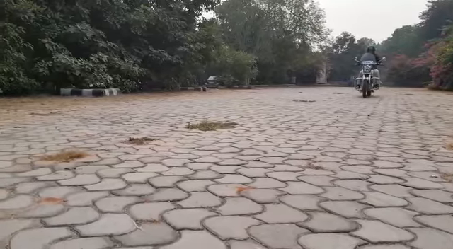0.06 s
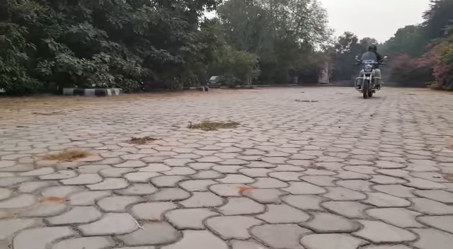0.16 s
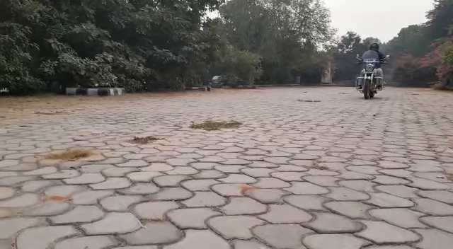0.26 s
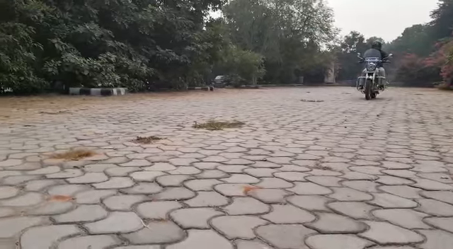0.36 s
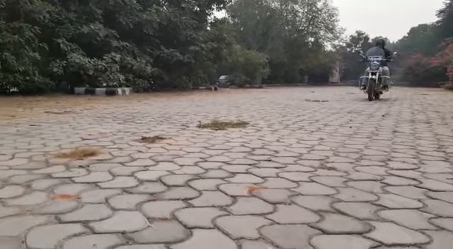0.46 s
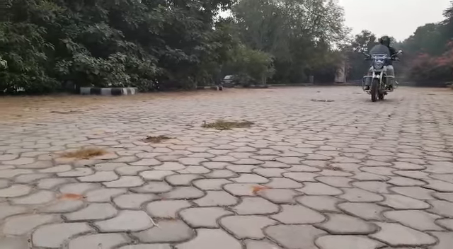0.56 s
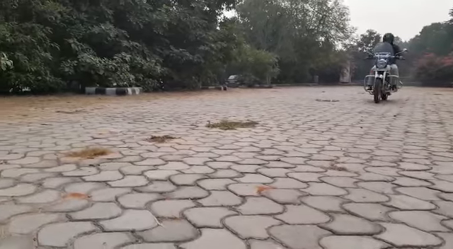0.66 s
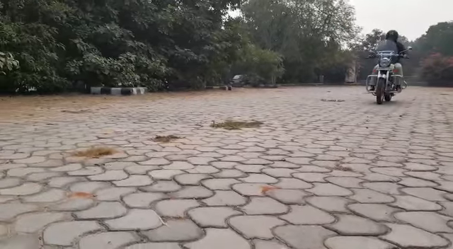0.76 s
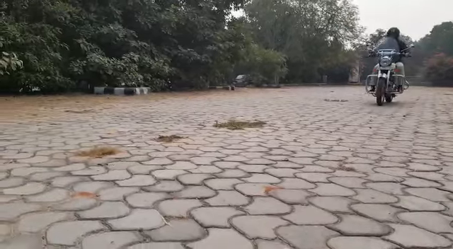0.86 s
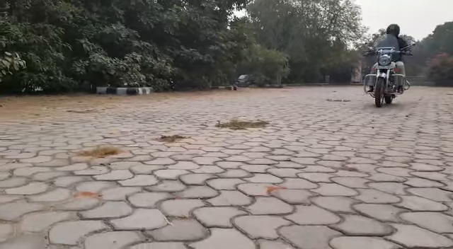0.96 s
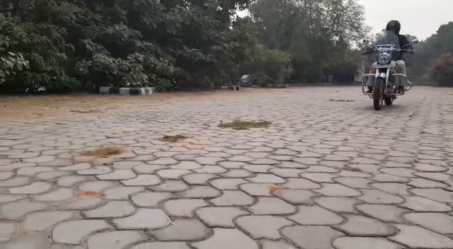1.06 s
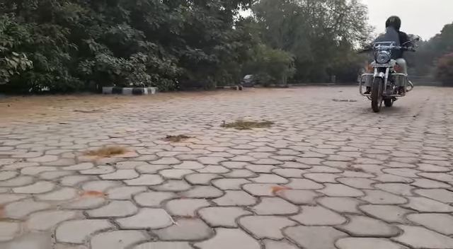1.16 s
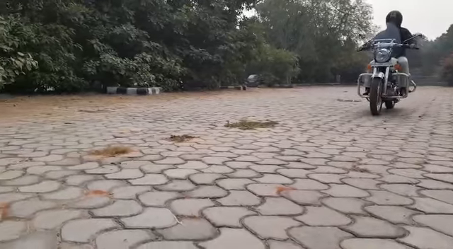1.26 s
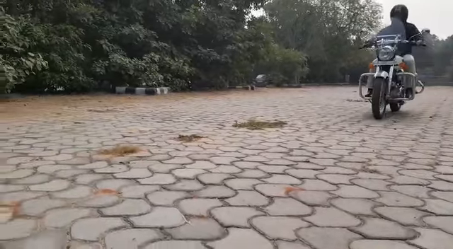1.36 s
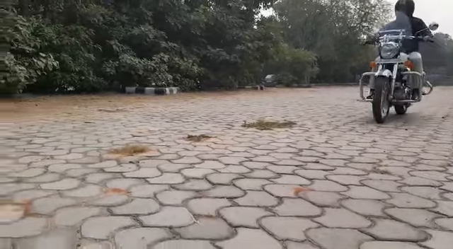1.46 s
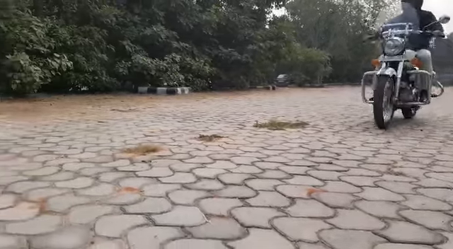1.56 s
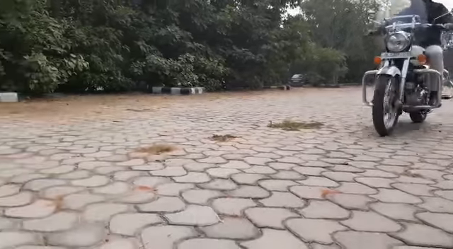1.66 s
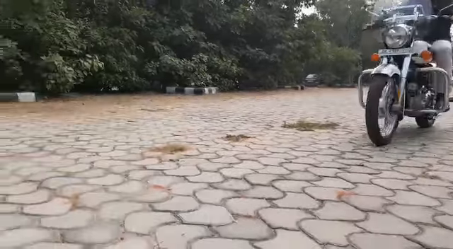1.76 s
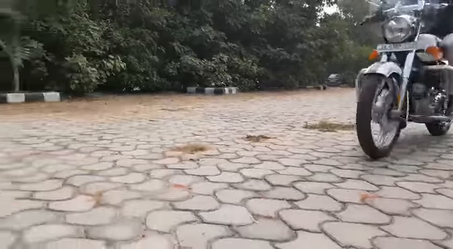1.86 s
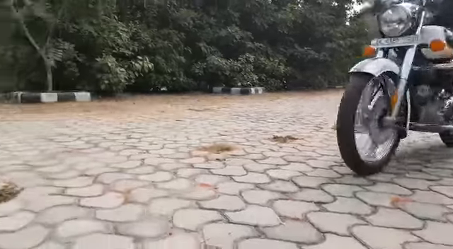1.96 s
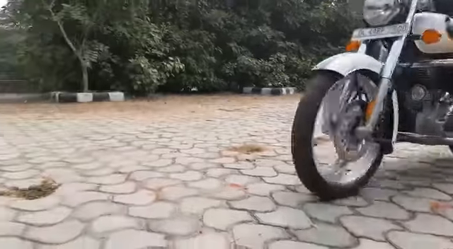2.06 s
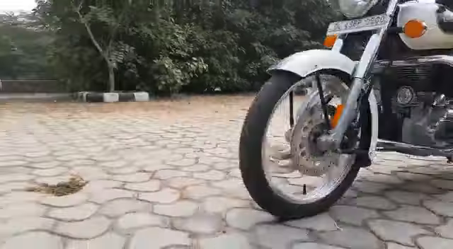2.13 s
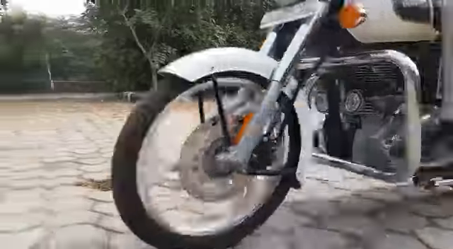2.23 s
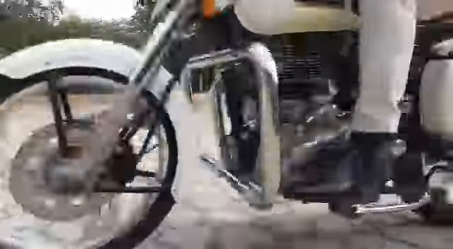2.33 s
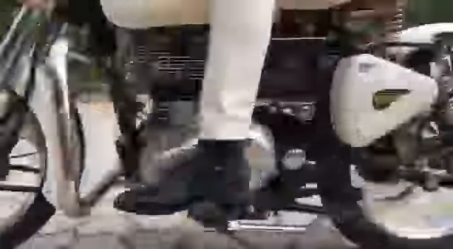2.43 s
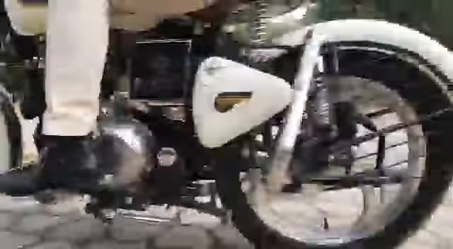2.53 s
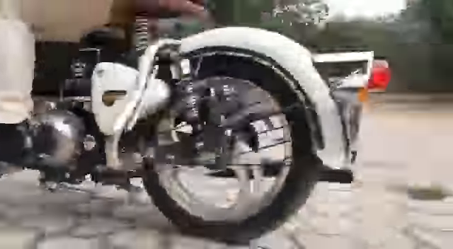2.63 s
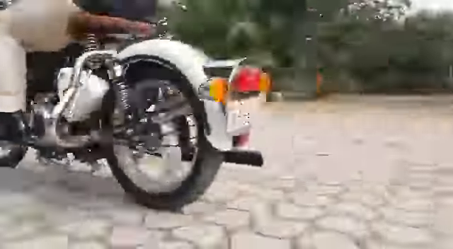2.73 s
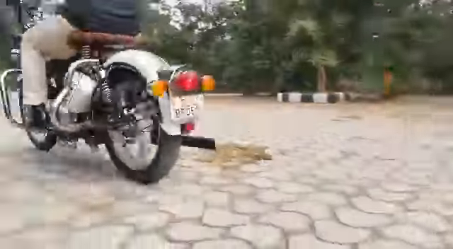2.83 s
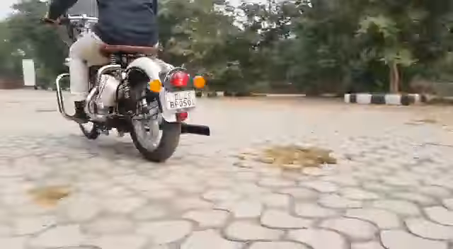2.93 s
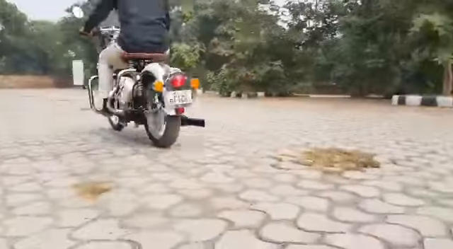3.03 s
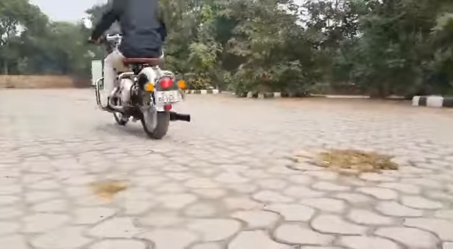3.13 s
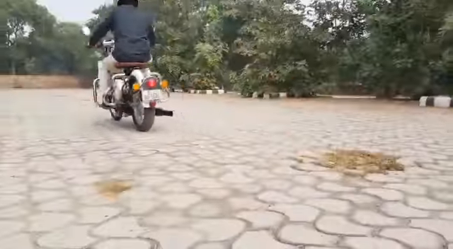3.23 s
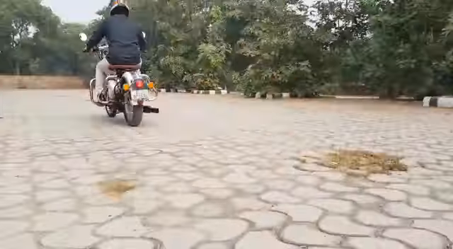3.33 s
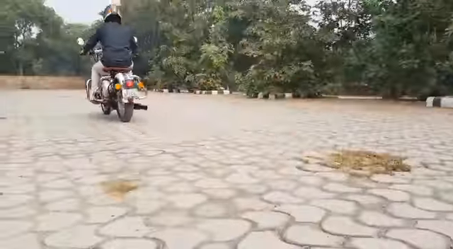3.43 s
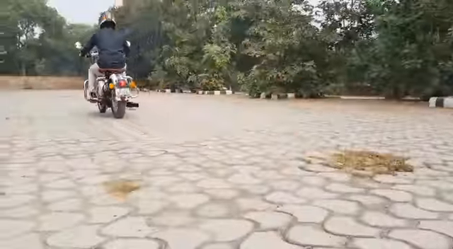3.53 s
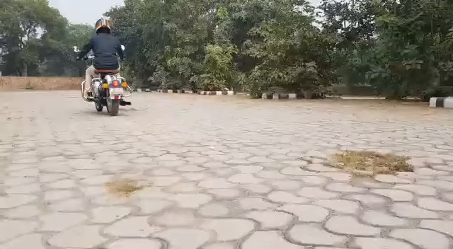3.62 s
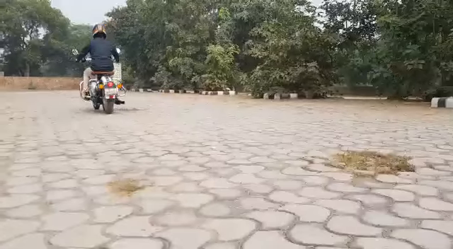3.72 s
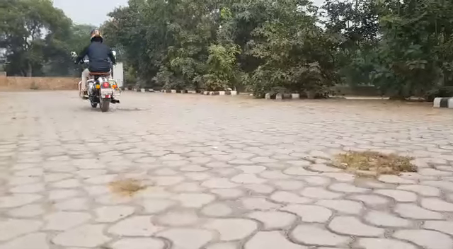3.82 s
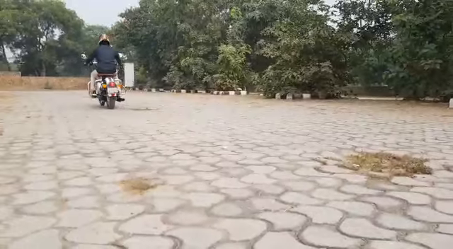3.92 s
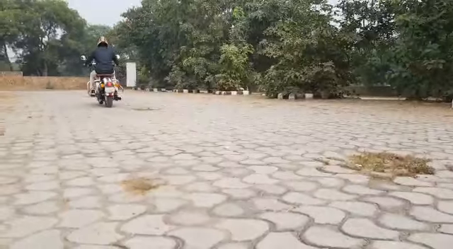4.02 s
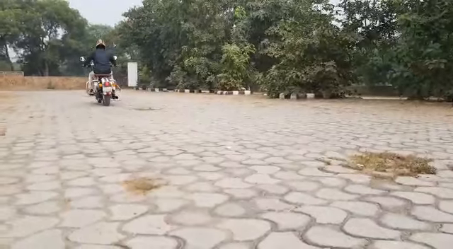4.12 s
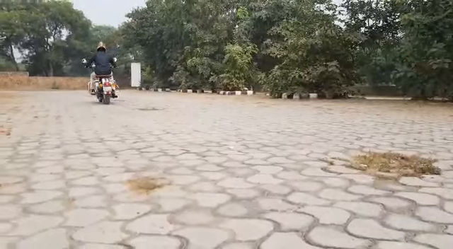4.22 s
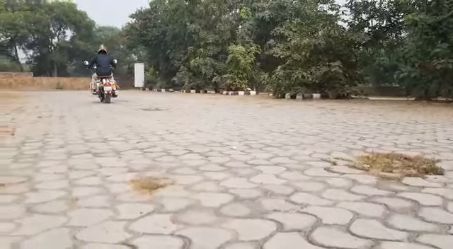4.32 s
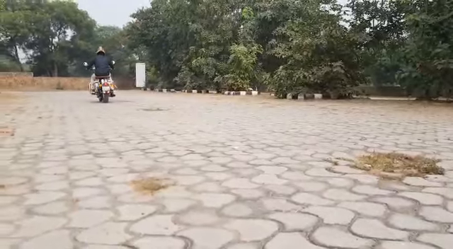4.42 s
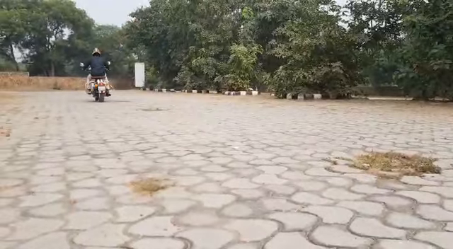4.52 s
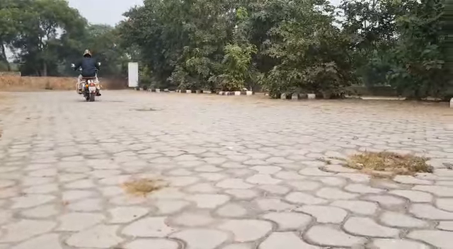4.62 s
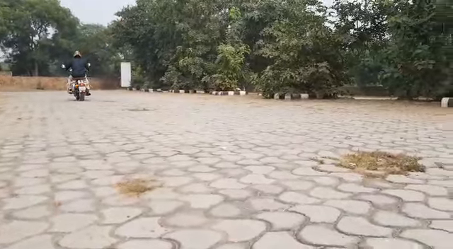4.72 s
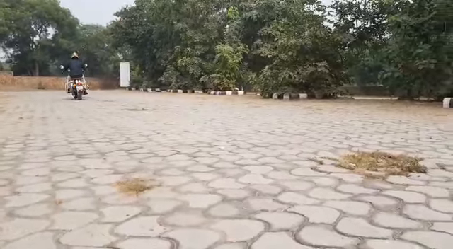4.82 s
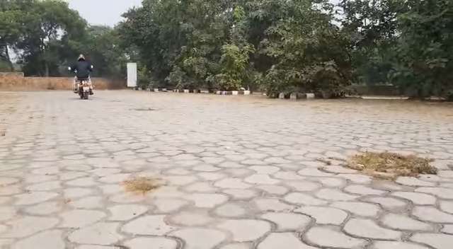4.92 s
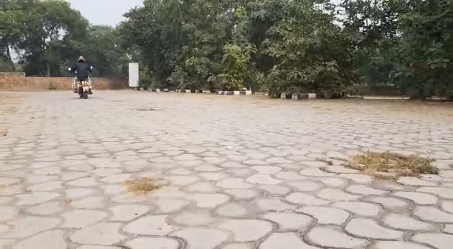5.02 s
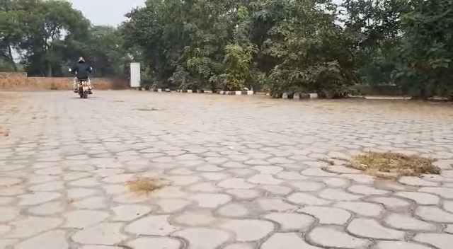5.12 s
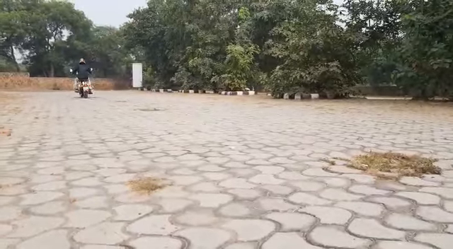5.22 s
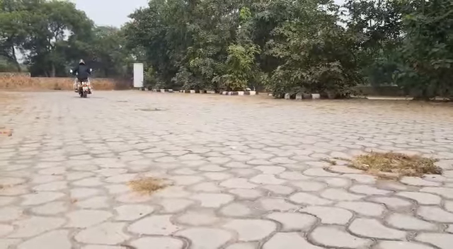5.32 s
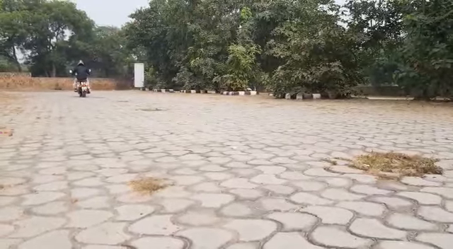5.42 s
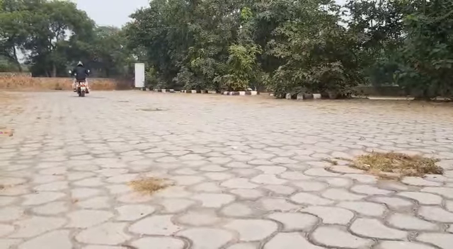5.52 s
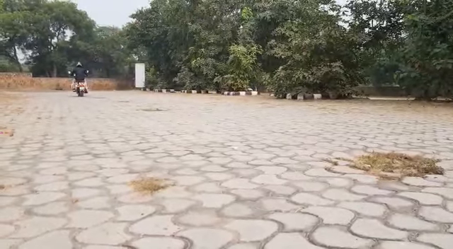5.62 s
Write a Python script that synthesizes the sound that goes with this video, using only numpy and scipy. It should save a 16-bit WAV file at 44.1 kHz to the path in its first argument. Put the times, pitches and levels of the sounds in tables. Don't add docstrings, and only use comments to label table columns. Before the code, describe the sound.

A single-cylinder motorcycle thumps towards a low microphone, passes very close with rattling chain and metal, then rides off with a barking exhaust.

```python
import sys
import numpy as np
from scipy import signal
from scipy.fft import rfft, irfft, next_fast_len
from scipy.io import wavfile
from scipy.ndimage import uniform_filter1d, map_coordinates

SR = 44100
rng = np.random.default_rng(int(sys.argv[2]) if len(sys.argv) > 2 else 0)


def boost_factor(decibels):
    exponent = np.asarray(decibels, float) / 20
    return 10 ** exponent


def store_pcm(level_fs):
    pcm = np.round(np.clip(level_fs, -1, 1) * 32767).astype(np.int16)
    wavfile.write(sys.argv[1], SR, np.atleast_2d(pcm).T)


N = 250488

# time_s, firing_rate_hz, trough_peak_db
ENGINE_CURVE = [(0.0, 12.294, -12.0), (0.24, 13.187, -9.4), (0.62, 13.338, -9.1), (1.78, 14.487, -2.6),
                (1.9, 14.387, -2.3), (2.1, 14.808, -0.9), (2.59, 15.009, -1.3), (2.83, 14.812, -0.7),
                (3.58, 15.169, -10.6), (4.17, 15.449, -12.0), (4.34, 15.353, -11.3), (4.97, 15.763, -10.2),
                (5.36, 15.808, -11.4), (5.68, 15.893, -13.3)]
# time_s, level_db (over its far level)
NEARNESS = [(0, 2.5), (.75, 5.5), (1.4, 9), (1.88, 16), (2.06, 18.5), (2.23, 22), (2.4, 25), (2.66, 19),
            (2.8, 14.5), (3.01, 9), (3.3, 5.5), (3.75, 1.5), (4.1, 0.5), (5.68, 0)]


def rms_one(x):
    return x / np.sqrt(np.mean(x ** 2) + 1e-20)


def in_time(rows):
    time_s, *columns = np.transpose(rows)
    return [np.interp(np.arange(N) / SR, time_s, column) for column in columns]


def at_hz(points, hz):
    return np.interp(np.log(hz), np.log(np.array(points)[:, 0]), np.array(points)[:, 1])


def drift(rate):
    r = np.exp(-80 * np.pi * rate / SR)
    slow = signal.lfilter([1], [1, -2 * r, r * r], rng.standard_normal(N // 40 + 2002))[2000:]
    return np.interp(np.arange(N) / 40, np.arange(len(slow)), rms_one(slow))


def ring(clicks, hz, t60):
    r = boost_factor(-60 / (t60 * SR))
    w = 2 * np.pi * hz / SR
    return signal.lfilter([0, np.sin(w)], [1, -2 * r * np.cos(w), r * r], clicks + 1e-18)


def band(x, low_hz, high_hz, order=2):
    sos = signal.butter(order, [low_hz, min(high_hz, .45 * SR)], "band", fs=SR, output="sos")
    return signal.sosfilt(sos, x)


def train(beats, after_s, sizes):
    at = ((beats[:, 0] + after_s) * SR).astype(int)
    out = np.zeros(N)
    out[at[at < N]] = sizes[at < N]
    return out


def facing_shares(alongside, tail_on):
    return np.array([(1 - alongside) * (1 - tail_on), alongside, (1 - alongside) * tail_on])


def firings():
    rate, level_db = in_time(ENGINE_CURVE)
    t = np.arange(N) / SR
    first_s, jitter_s, jitter_db = .0517, .0003, .4
    cycles = np.cumsum(rate) / SR
    cycles -= np.interp(first_s, t, cycles)
    s = np.interp(np.arange(int(cycles[-1]) + 1), cycles, t)
    uneven = rng.standard_normal((len(s), 2)) * [jitter_s, jitter_db]
    return np.c_[s, np.interp(s, t, level_db)] + uneven


def exhaust(beats, alongside, tail_on):
    # pitch_hz, t60_s, head_on_height, alongside_height, tail_on_height (signed)
    pipe_modes = [(57.6, 0.138, 0.26, 0.45, 0.31), (77.2, 0.058, -0.75, -0.95, -0.75),
                  (139.2, 0.036, -1.27, -2.0, -0.95), (136.1, 0.089, 1.2, 1.72, 0.98),
                  (185.5, 0.041, 0.88, 1.11, 0.52), (210.5, 0.054, 0.19, 0.09, 0.56),
                  (251.2, 0.051, -0.29, -0.32, -0.51), (317.3, 0.049, -0.38, -0.35, -0.42),
                  (392.6, 0.038, 0.24, 0.18, 0.27), (518.5, 0.065, -0.05, -0.03, -0.05),
                  (642.9, 0.131, 0.01, 0.02, 0.03)]
    lead_s = .0044
    s, level_db = beats.T
    facing = facing_shares(alongside, tail_on)[:, (s * SR).astype(int)]
    out = np.zeros(N)
    for hz, t60, *heights in pipe_modes:
        uneven_db = .25 * rng.standard_normal(len(s))
        sizes = boost_factor(level_db - 0.14 + uneven_db) * (heights @ facing)
        out += ring(train(beats, -lead_s, sizes), hz, t60)
    soft_edge = signal.butter(2, 700, fs=SR, output="sos")
    return signal.sosfilt(soft_edge, out)


def bark(beats, tail_on):
    echo_s, echo_db = .0175, 0.5
    sizes = boost_factor(beats[:, 1:] + 2 * rng.standard_normal((len(beats), 2))).T
    first = train(beats, -0.00303, sizes[0])
    second = train(beats, echo_s, sizes[1] * boost_factor(echo_db))
    edge = boost_factor(-31) * ring(first, 674, 0.023)
    edge += boost_factor(-29) * ring(first + second, 745, .022)
    edge += boost_factor(-38.5) * ring(first, 920, 0.011)
    back = boost_factor(-31.5) * ring(second, 866, 0.052) + boost_factor(-30) * ring(second, 1023, 0.021)
    return tail_on * (edge + back)


def fins(beats, alongside, tail_on):
    ring_hz, wander_hz = 985, 7
    swell_after_s, swell_s, steady = .027, .009, .45
    hidden_at = .3
    level = boost_factor(-32.5 + 1.35 * in_time(ENGINE_CURVE)[1])
    level = level * np.clip(1 - (alongside / hidden_at) ** 2 - 5 * tail_on, 0, 1)
    bump = np.exp(-.5 * (np.arange(-1500, 1501) / SR / swell_s) ** 2)
    hits = train(beats, swell_after_s, rng.gamma(5, .2, len(beats)))
    swell = signal.fftconvolve(hits, bump, "same")
    tone = np.sin(2 * np.pi * np.cumsum(ring_hz + wander_hz * drift(12)) / SR)
    tone *= boost_factor(1.2 * drift(3))
    return level * rms_one((steady + swell) * tone)


def contact_gate(beats, tail_on):
    # after_trough_ms, width_ms, head_on_power, tail_on_power (over the steady part)
    contacts = [
        (0.1, 1.2, 0.36, 0.9),
        (18.2, 5.4, 0.96, 0.59),
        (39, 2.6, 0.6, 0.55),
        (52, 1.2, 0.36, 0.1),
    ]
    power = np.ones(N)
    for after_ms, width_ms, head, tail in contacts:
        bump = np.exp(-.5 * (np.arange(-800, 801) / SR * 1000 / width_ms) ** 2)
        hits = train(beats, after_ms / 1000, rng.gamma(4, .25, len(beats)))
        power += signal.fftconvolve(hits, bump, "same") * np.maximum(head + tail_on * (tail - head), 0)
    return np.sqrt(power / uniform_filter1d(power, size=SR // 5))


def coloured(white, points, rings=()):
    size = next_fast_len(N)
    hz = np.fft.rfftfreq(size, 1 / SR) + 1
    gain_db = at_hz(points, hz)
    for mid_hz, width_hz, lift_db in rings:
        gain_db = gain_db + lift_db / (1 + (2 * (hz - mid_hz) / width_hz) ** 2)
    gain = boost_factor(gain_db)
    return irfft(rfft(white, size) * gain, size)[..., :N], hz, gain ** 2 / len(hz)


def noise_bank(noise, edges, patchy_db):
    # pitch_hz, power_share
    straight_share = [(60, 0.84), (600, 0.96), (1500, 0.22), (4000, 0.36), (15000, 0.048)]
    out, together = 0, drift(4.3)
    for k, (low, high) in enumerate(zip(edges, edges[1:])):
        direct = np.clip(at_hz(straight_share, np.sqrt(low * high)), 0, 1)
        shares = np.sqrt([[direct], [1 - direct], [1 - direct]])
        flicker = boost_factor(patchy_db * (0.5 * together + drift(31)))
        out = out + flicker * shares * band(noise[k % 2], low, high)
    return out


def wall_db():
    return np.clip(9 * (np.arange(N) / SR - 4.16), 0, 5)


def running_gear(beats, alongside, tail_on):
    # far_level_db, nearness_share, exhaust_level_share, alongside_change_db, tail_on_change_db
    gear_ranges = [
        (-36.5, 0.18, 0.57, .5, -4.5),
        (-41.5, 0.12, 0.39, 6.5, -6.5),
        (-57.5, 0.96, .01, -0.1, 0.5),
        (-61.5, 1, .01, -0.5, 2.5),
    ]
    edges_hz = [450, 1000, 2200, 6000, 17500]
    wall_shares = [0.33, 0.5, .1, 0.12]
    # pitch_hz, density_db (per Hz)
    head_colour = [(260, -33), (440, -3), (534, -1), (788, -16), (986, -3), (1180, -19), (1480, -13),
                   (1820, -24), (4950, -30), (15600, -41)]
    side_colour = [(260, -30), (440, 0), (489, -8), (551, 0), (800, -4), (986, -1), (1220, -10), (1570, -8),
                   (2890, -15), (7530, -20), (9140, -23), (12100, -22), (15600, -25)]
    tail_colour = [(260, -31), (440, -1), (474, -4), (602, 0), (776, -11), (1000, -9), (1570, -22),
                   (3560, -28), (7530, -32), (15600, -37)]
    # pitch_hz, width_hz, lift_db
    head_rings = [(537, 40, 3), (720, 120, 2), (1090, 60, 4), (1170, 60, -5), (1280, 50, 2), (1400, 60, 2),
                  (1510, 80, 2), (1700, 22, 5), (2000, 60, 4), (2430, 40, 4), (2300, 700, 2),
                  (3300, 300, -2), (3720, 60, 4), (4200, 700, 2), (4960, 100, 3), (5700, 500, -2),
                  (7700, 900, 2)]
    tail_rings = [(470, 40, -4), (530, 30, 4), (592, 40, 2), (775, 40, -2), (870, 80, 2), (2000, 900, 2),
                  (3150, 250, 2), (4850, 200, 2), (5800, 900, -2), (7700, 1100, 3), (9500, 1200, -2),
                  (12500, 4000, 2)]
    gate_depths = [0.94, 1.0, 0.68, 0.8]
    white = rng.standard_normal((2, 3, N))
    views = [coloured(white, head_colour, head_rings), coloured(white, side_colour),
             coloured(white, tail_colour, tail_rings)]
    facing = facing_shares(alongside, tail_on)
    gate = contact_gate(beats, tail_on)
    near_db, engine_db = in_time(NEARNESS)[0], in_time(ENGINE_CURVE)[1]
    out = 0
    for row, wall, low, high, depth in zip(gear_ranges, wall_shares, edges_hz, edges_hz[1:], gate_depths):
        far_db, follows, loaded, side_db, tail_db = row
        noise = 0
        for share, (view, hz, power) in zip(facing, views):
            noise = noise + share * view / np.sqrt(power[(hz > low) & (hz < high)].sum())
        level_db = far_db + 2.0 + follows * near_db + loaded * engine_db + wall * wall_db()
        level_db = level_db + side_db * alongside ** 2 + tail_db * tail_on
        bands = noise_bank(noise, np.geomspace(low, high, num=5), patchy_db=1.26)
        out = out + boost_factor(level_db) * gate ** depth * bands
    return out


def clatter(beats):
    # start_s, level_db (over the tappet)
    chain_slaps = [(2.0082, -1), (2.0785, -3), (2.2776, -3), (2.4542, 0), (2.4791, 0), (2.5405, -8),
                   (2.5764, 4), (2.593, 2), (2.607, .3), (2.6542, 1.2), (2.7141, 3), (2.7355, 1.5),
                   (2.771, 0), (2.7964, 5), (2.8248, .1), (2.8857, -3), (2.973, 4), (2.9914, 4.5),
                   (3.1007, -2), (3.164, -1), (3.29, 4), (3.319, 1.5), (3.3546, 1.5)]
    # start_s, peak_db, pitch_hz, t60_s
    casing_knocks = [(2.165, -24, 1143, 0.12), (2.225, -19, 636, 0.11), (2.262, -17, 1600, 0.03),
                     (2.298, -14.5, 990, 0.067), (2.3, -23, 1470, 0.033), (2.34, -12, 1720, 0.031),
                     (2.36, -32, 655, 0.095), (2.372, -17, 980, 0.079), (2.425, -18.5, 2140, .04),
                     (2.53, -29.5, 1685, .06), (2.565, -25, 2540, 0.055), (2.632, -31, 1140, 0.045)]
    near_db = in_time(NEARNESS)[0]
    clicks = train(beats, .0135, 1. * (beats[:, 0] < 2.53))
    clicks *= np.interp(near_db, [3, 12], [0, 1])
    clicks[[round(s * SR) for s, db in chain_slaps]] = boost_factor(np.array(chain_slaps)[:, 1])
    clicks *= boost_factor(near_db - 50.5)
    burst = signal.lfilter([1], [1, -boost_factor(-60 / (0.032 * SR))], clicks + 1e-18)
    out = np.zeros((3, N))
    for s, level_db, hz, t60 in casing_knocks:
        shake = np.zeros(SR // 5)
        shake[:300] = signal.windows.hann(300) * np.cos(2 * np.pi * hz * np.arange(300) / SR) / 75
        out[0, round(s * SR):][:len(shake)] += boost_factor(level_db - 1) * ring(shake, hz, t60)
    hiss = burst * rng.standard_normal((3, N))
    return out + band(hiss, 3000, 18000) + band(hiss, 4050, 4930) + 0.93 * band(hiss, 7300, 8480)


def loose_parts(alongside):
    contacts_per_s = 400
    sizes = boost_factor(2.5 * np.minimum(rng.exponential(1, N), 4)) * (rng.random(N) < contacts_per_s / SR)
    dealt = rng.integers(0, 14, N)
    rings = 0
    for k, hz in enumerate(np.geomspace(650, 3200, num=14)):
        rings = rings + ring(sizes * (dealt == k), hz, 20.0 / hz)
    return boost_factor(-35.5) * alongside * rms_one(rings)


def scuffs():
    # start_s, length_s, centre_hz, width_octaves,
    # level_db
    scuff_events = [(3.75, .74, 3120, .06, -64), (3.359, .04, 3200, 2.4, -49),
                    (3.526, .033, 4100, 1.3, -43.5), (3.553, .015, 3520, .5, -37),
                    (3.549, .017, 1750, .45, -40.5), (3.546, .033, 4300, 3.0, -43.5),
                    (3.527, .05, 12500, .6, -50), (3.527, .05, 7600, .25, -52), (3.1, .95, 7650, .17, -63),
                    (4.43, .16, 11000, .9, -63), (4.425, .14, 3200, .9, -54), (4.53, .008, 11000, .91, -60),
                    (5.527, .006, 7500, .31, -59), (5.57, .012, 7500, .37, -57),
                    (5.59, .006, 9000, 1.2, -52), (5.65, .008, 11500, 1.8, -44)]
    out = np.zeros((2, N))
    for s, length_s, hz, octaves, level_db in scuff_events:
        at, size = round(s * SR), round(length_s * SR)
        grit = rng.standard_normal((3, SR))
        grit = grit[0] + grit[1:]
        grit = band(grit, hz * 2 ** (-octaves / 2), hz * 2 ** (octaves / 2))[:, 500:500 + size]
        out[:, at:at + size] += boost_factor(level_db) * rms_one(grit) * signal.windows.tukey(size, .6)
    return out


def lot(tail_on):
    # pitch_hz, density_db (per Hz)
    echo_colour = [(32, -35), (55, -5), (108, 1), (171, -5), (227, -1), (280, -8), (340, -8), (450, -21),
                   (580, -51), (990, -120)]
    # pitch_hz, loudest_at_s, level_db, swell_db_per_s, fade_db_per_s
    drone_tones = [
        (44, 5.27, -29.5, 120, 14),
        (80, 5.56, -34, 40, 120),
        (108, 5.53, -35, 55, 90),
    ]
    noise = coloured(rng.standard_normal((2, 3, N)), echo_colour)[0]
    echo = noise_bank(noise, np.geomspace(55, 460, num=6), patchy_db=2.5)
    level_db = -31 + 0.34 * in_time(ENGINE_CURVE)[1] - 7 * tail_on + wall_db()
    echo = boost_factor(level_db) * echo / np.sqrt(np.mean(echo[0] ** 2 + echo[1] ** 2))
    for hz, s, top_db, swell, fade in drone_tones:
        late = np.arange(N) / SR - s
        level = boost_factor(top_db + 1.5 + np.minimum(swell * late, -fade * late))
        phase = 2 * np.pi * np.cumsum(hz * (1 + 0.0296 * drift(3.3))) / SR
        echo[0] += level * np.sin(phase)
    return echo


def ports(x, lag, pan_db):
    n, sides = np.arange(N), np.array([[1], [-1]])
    pair = np.array([map_coordinates(x, [n - side * lag / 2], order=3, mode="nearest") for side in (1, -1)])
    treble = pair - signal.lfilter([.4], [1, -.6], pair)
    shaded = pair + treble * (boost_factor(-.3 * lag * sides) - 1)
    return shaded * boost_factor(pan_db / 2 * sides)


def scene():
    # time_s, alongside_share, tail_on_share, left_lag_samples, left_right_db
    ride_path = [
        (0, 0, 0.0, 9.0, .4),
        (1.9, 0.05, 0.0, 10.0, .4),
        (2.35, .9, .1, 9.0, .5),
        (2.65, .95, .4, -6.0, .7),
        (2.9, 0.2, .8, -6.0, 1.0),
        (3.4, 0, 1.0, -8.0, 1.1),
        (5.68, 0, 1.0, -8.5, 1.1),
    ]
    alongside, tail_on, lag, pan_db = in_time(ride_path)
    alongside, tail_on = np.clip(alongside, 0, 1), np.clip(tail_on, 0, 1)
    beats = firings()
    engine = exhaust(beats, alongside, tail_on) + bark(beats, tail_on) + fins(beats, alongside, tail_on)
    rattle = running_gear(beats, alongside, tail_on) + clatter(beats)
    low = lot(tail_on)
    straight = engine + loose_parts(alongside) + rattle[0] + low[0]
    shade = boost_factor(-.08 * lag * np.array([[1], [-1]]))
    return ports(straight, lag, pan_db) + shade * rattle[1:] + low[1:] + scuffs()


def band_limit(x):
    return signal.sosfilt(signal.butter(12, 15800, fs=SR, output="sos"), x)


def record(dry):
    bass_cut = signal.butter(2, 36, "high", fs=SR, output="sos")
    mix = np.clip(signal.sosfilt(bass_cut, dry), -.99, .99)
    return band_limit(mix)


dry = scene()
out = record(dry)
store_pcm(out)
```